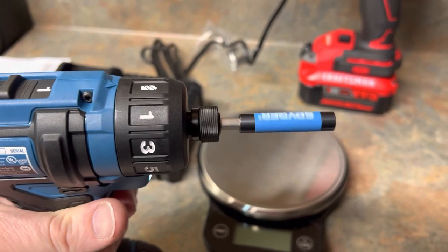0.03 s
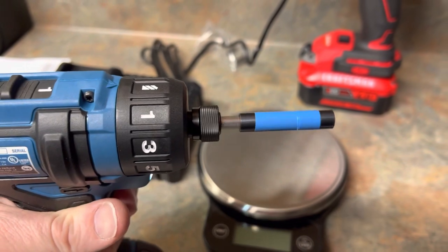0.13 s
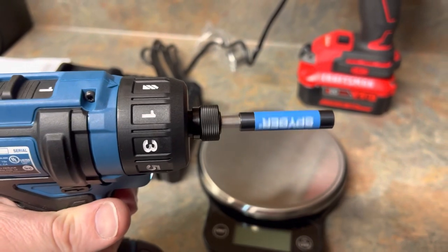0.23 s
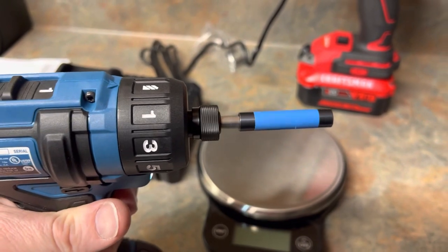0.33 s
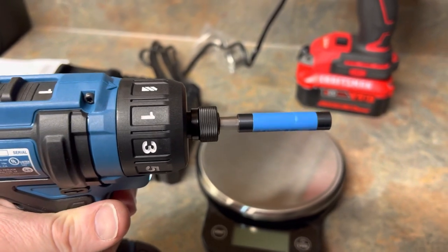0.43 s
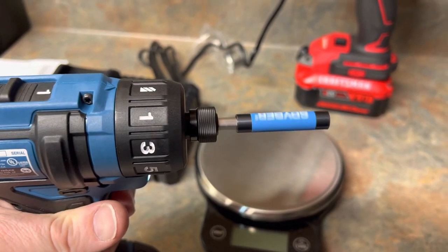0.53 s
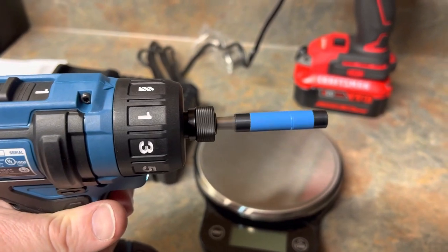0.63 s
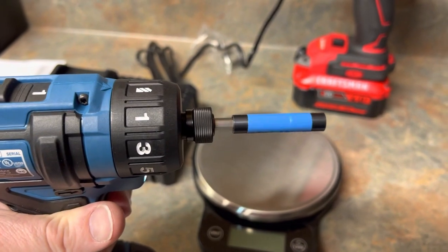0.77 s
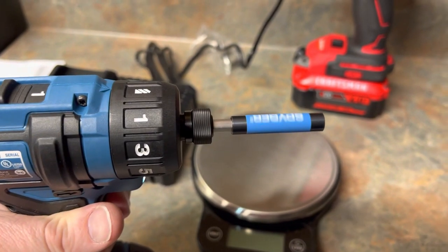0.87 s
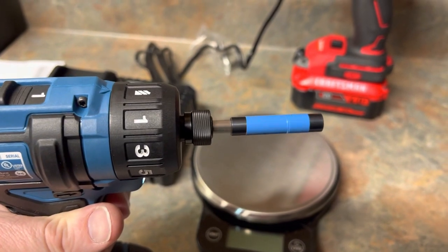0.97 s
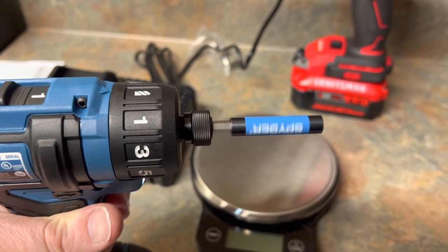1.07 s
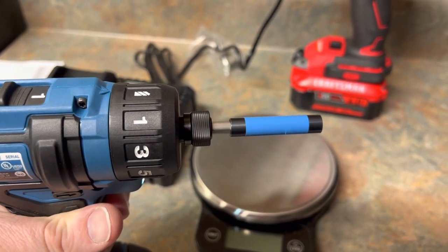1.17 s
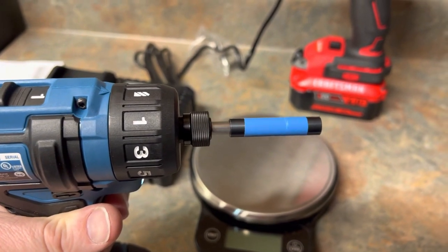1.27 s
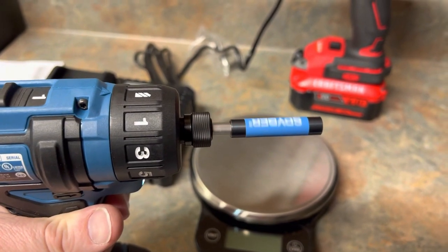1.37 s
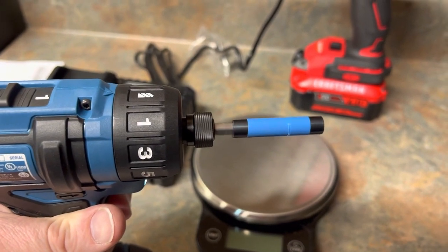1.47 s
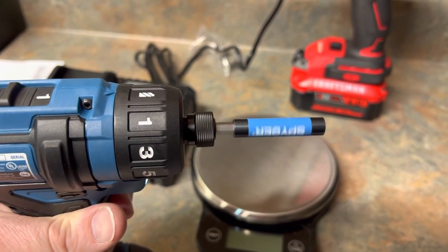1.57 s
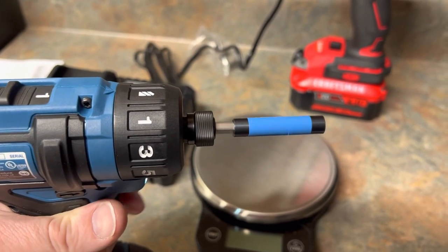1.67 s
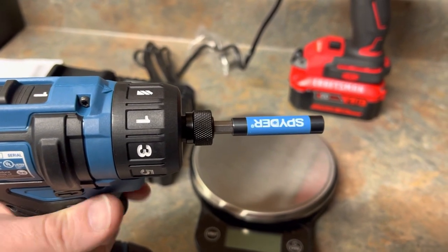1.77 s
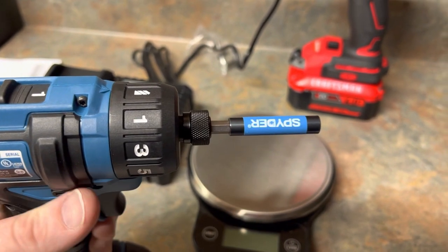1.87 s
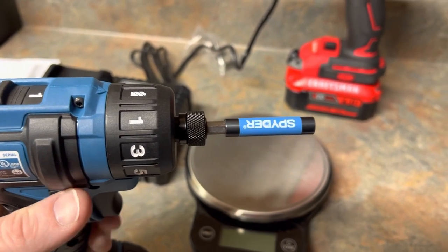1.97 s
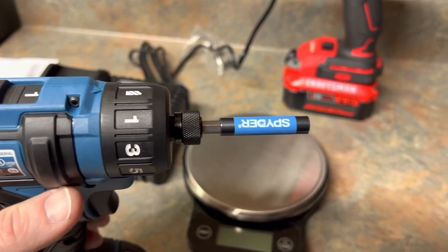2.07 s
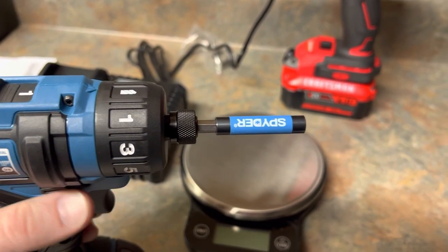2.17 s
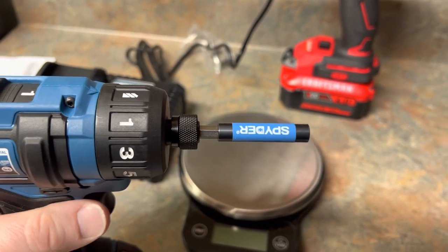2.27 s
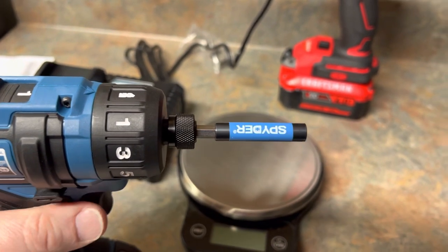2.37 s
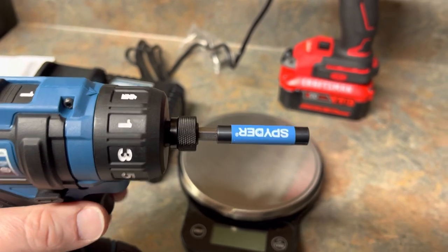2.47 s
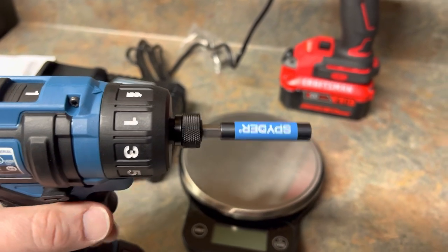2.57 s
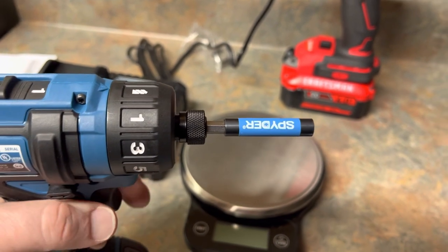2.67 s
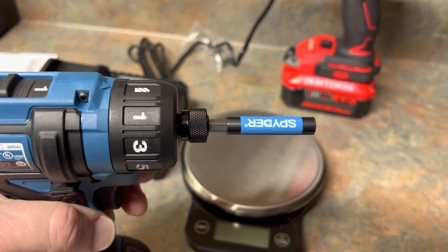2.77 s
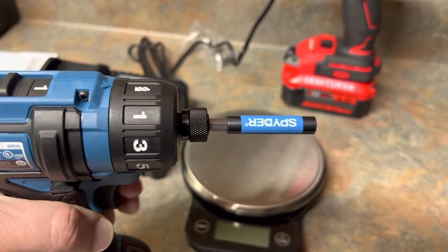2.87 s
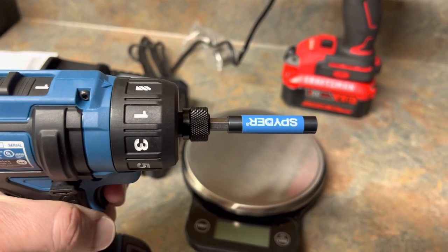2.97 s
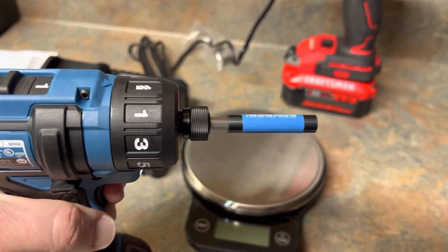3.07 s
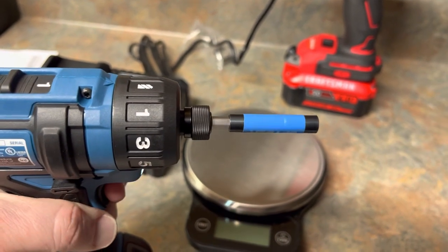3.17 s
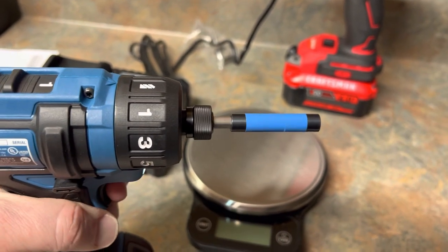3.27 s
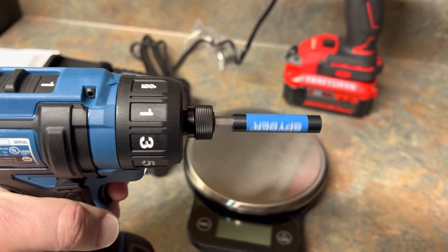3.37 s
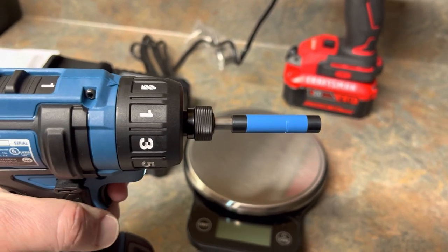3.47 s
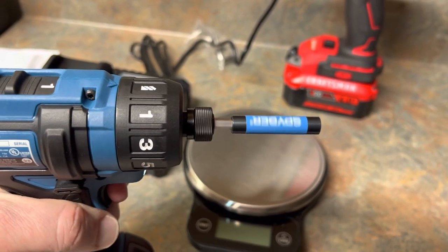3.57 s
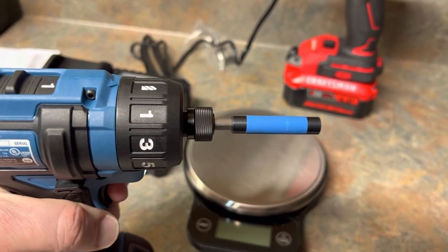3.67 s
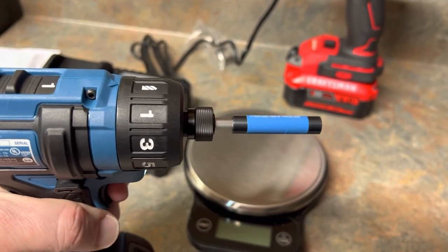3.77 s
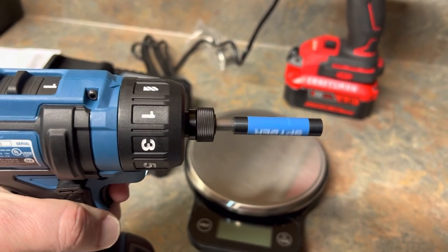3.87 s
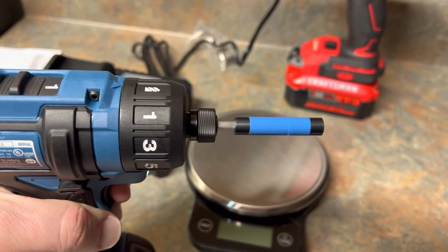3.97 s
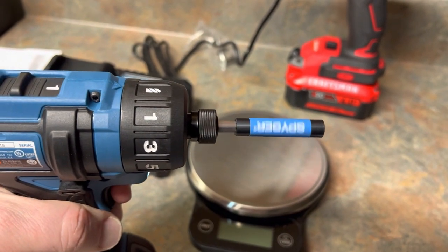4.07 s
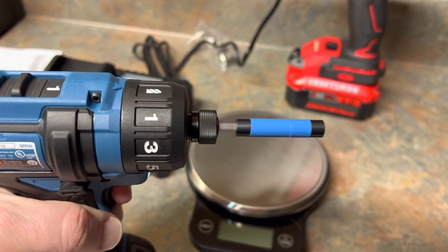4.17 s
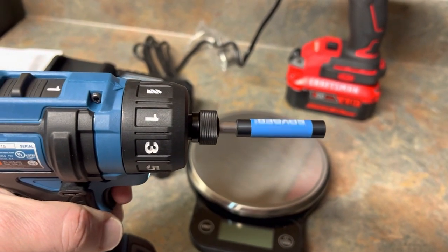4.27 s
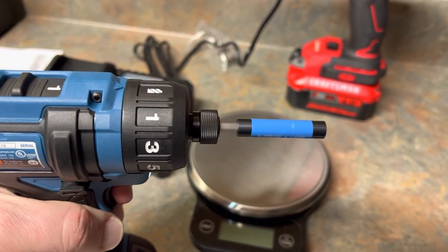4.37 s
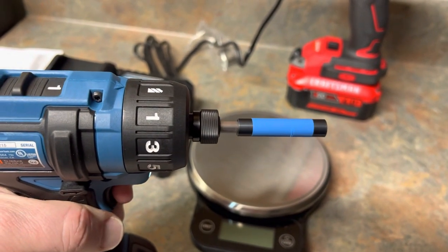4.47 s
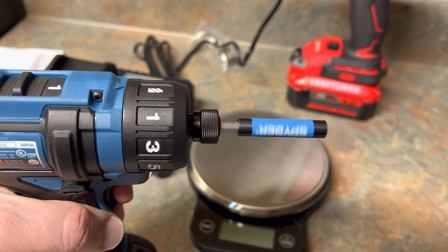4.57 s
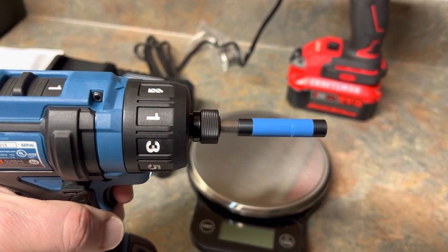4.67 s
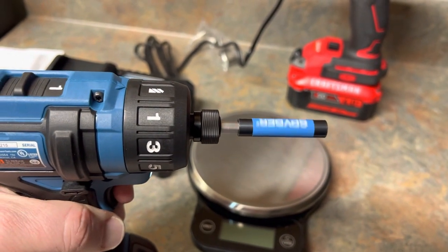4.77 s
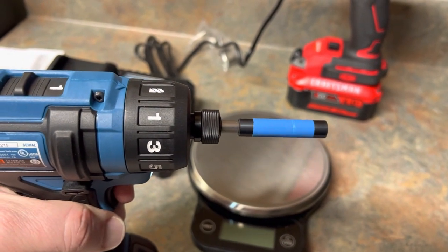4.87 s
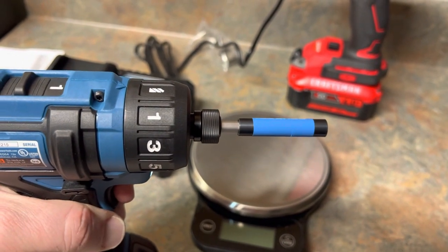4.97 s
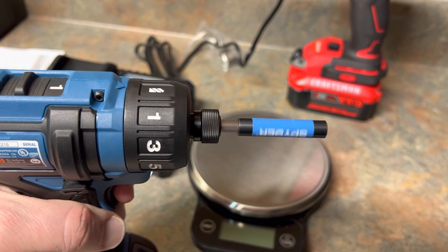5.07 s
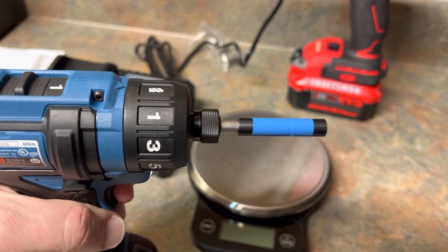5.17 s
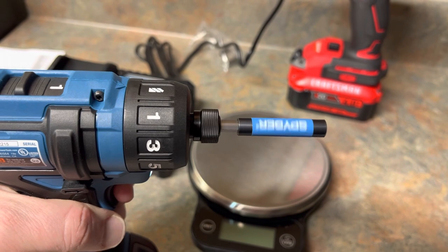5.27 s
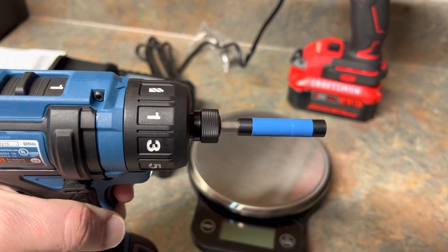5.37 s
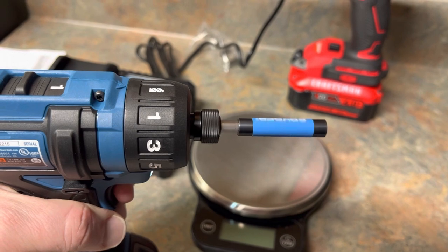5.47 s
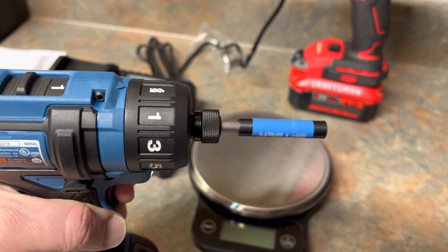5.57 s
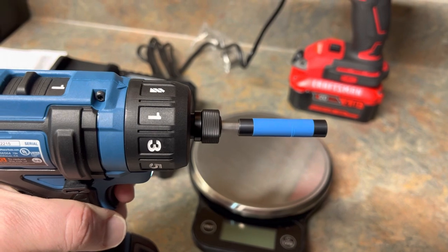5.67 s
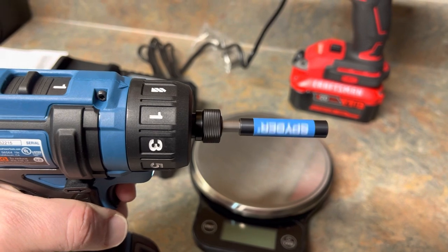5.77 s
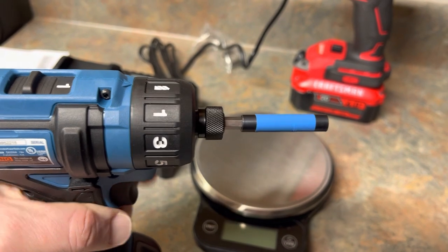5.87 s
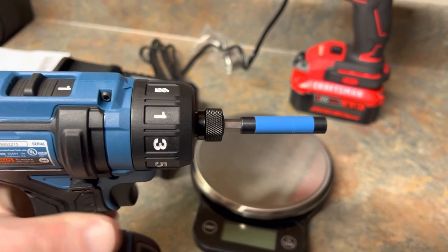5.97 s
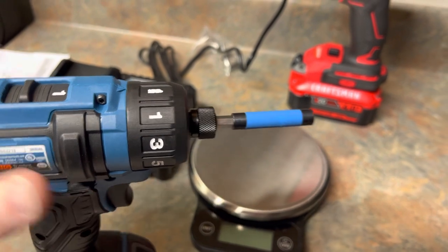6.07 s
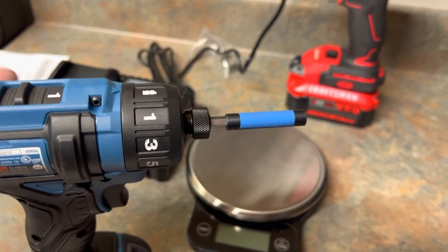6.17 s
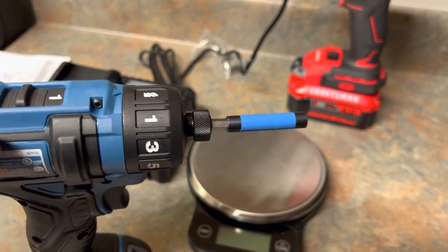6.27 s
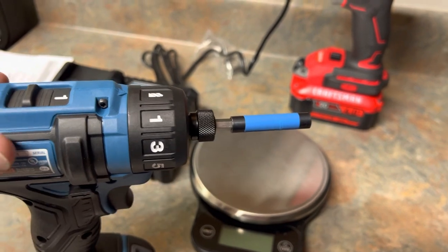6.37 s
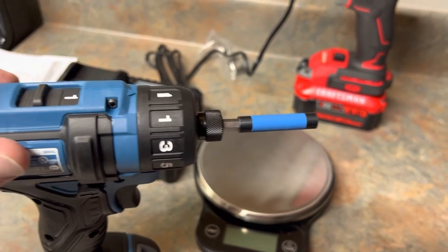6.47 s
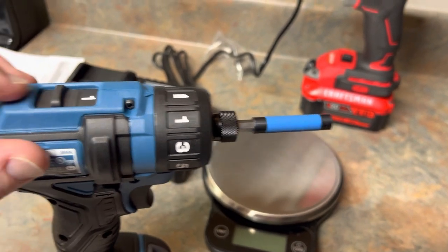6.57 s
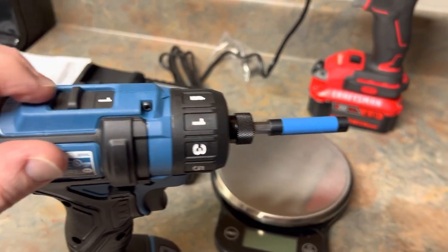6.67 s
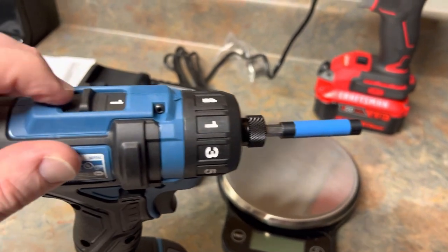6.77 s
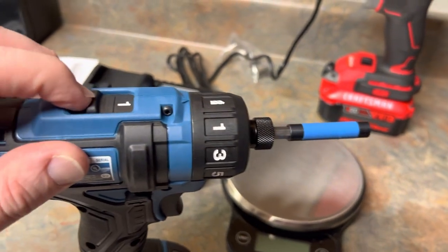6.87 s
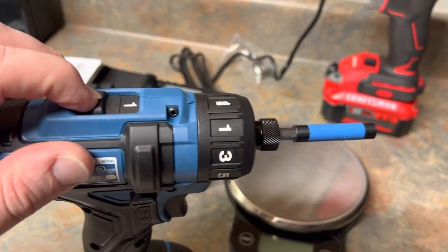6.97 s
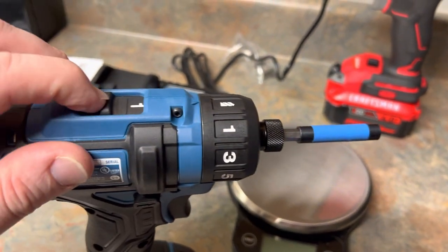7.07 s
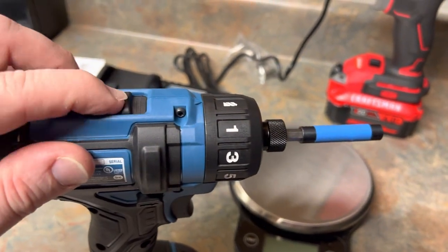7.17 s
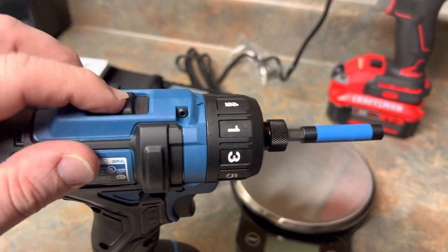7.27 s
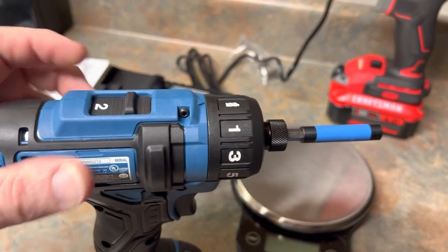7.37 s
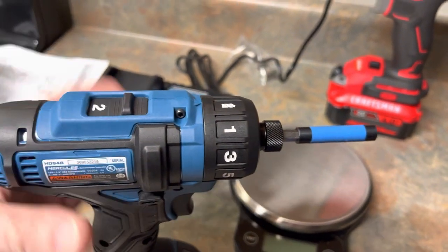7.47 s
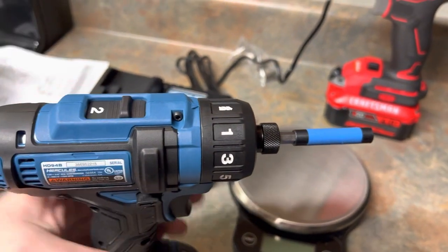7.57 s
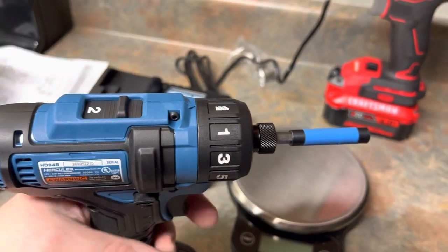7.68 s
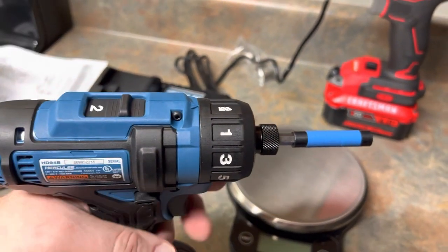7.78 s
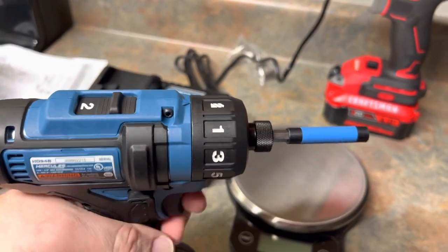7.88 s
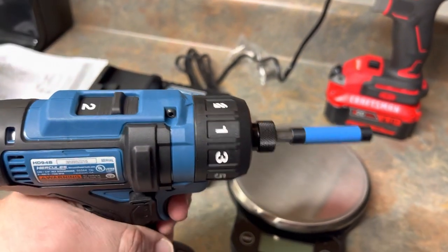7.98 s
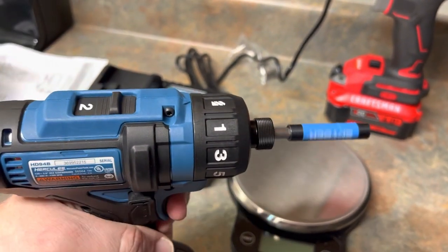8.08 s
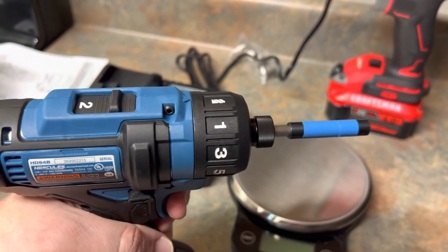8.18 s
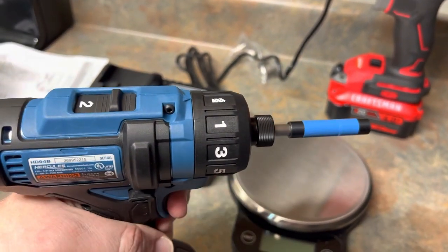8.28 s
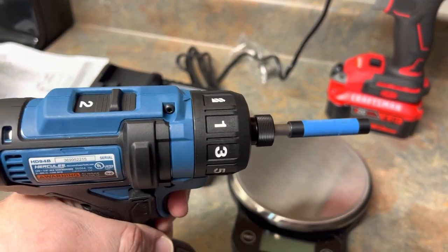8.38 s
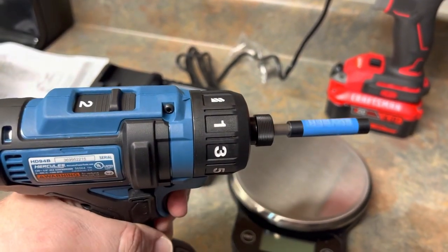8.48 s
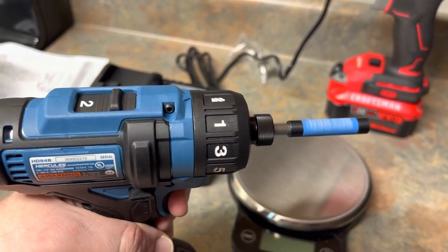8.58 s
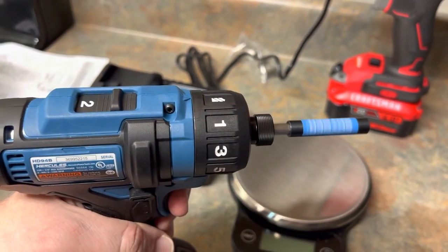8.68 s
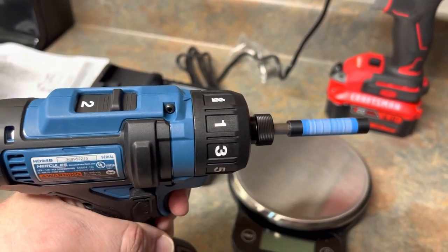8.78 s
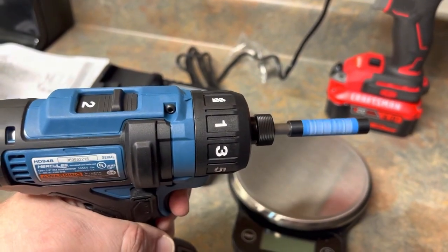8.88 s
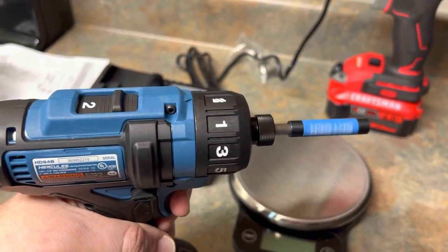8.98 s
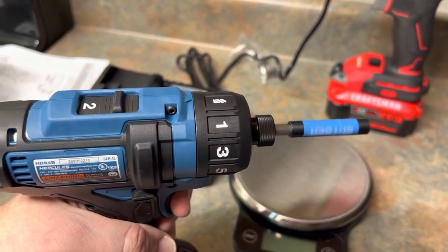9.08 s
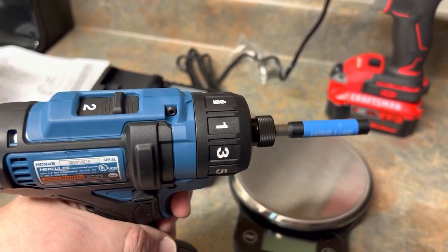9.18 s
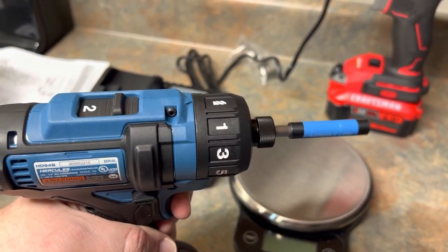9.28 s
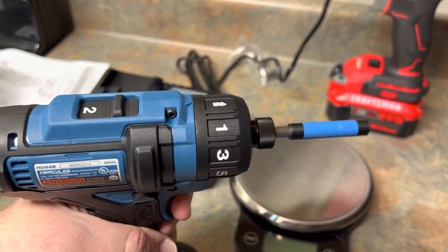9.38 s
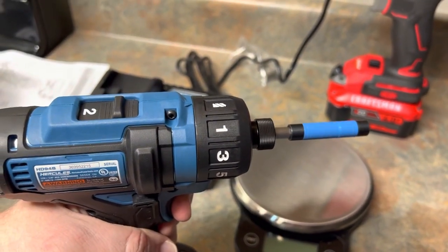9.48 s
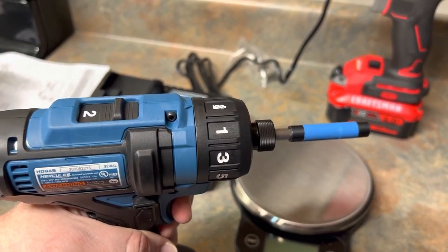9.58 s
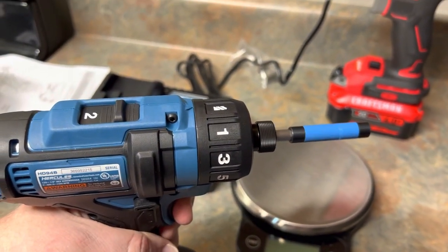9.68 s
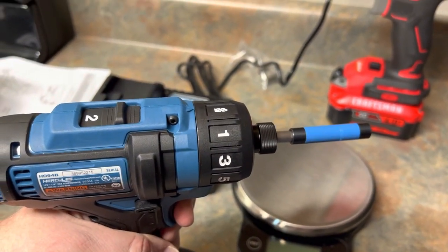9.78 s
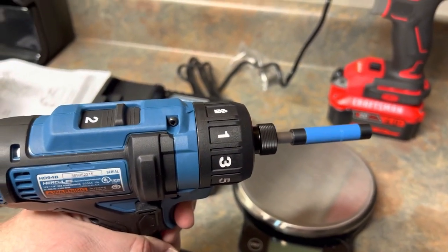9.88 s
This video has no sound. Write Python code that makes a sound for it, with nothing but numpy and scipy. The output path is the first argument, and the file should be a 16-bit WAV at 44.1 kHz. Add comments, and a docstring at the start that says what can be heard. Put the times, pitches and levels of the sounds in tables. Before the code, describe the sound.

Close up in a quiet kitchen, a cordless drill is already spinning unloaded, a steady whine over gear rattle. It brakes with a short clack. Soft handling bumps and clicks follow, then it runs again for about three seconds and stops. A hand flips a sharp switch, and a third, rougher run lasts until the cut.

```python
"""A cordless drill, already running close by, stops with a clack; two more free runs follow in a quiet kitchen.
The rotor sings in multiples of its speed, noise shaped by casing resonances is the gear rattle. Between runs a
hand shifts on the grip (noise swells) and flips switches (bursts ringing casing modes). Left and right differ
in phase and balance, with near reflections and the room's tail."""
import sys
import numpy as np
from scipy import signal
from scipy.fft import rfft, irfft, next_fast_len
from scipy.io import wavfile
from scipy.ndimage import uniform_filter1d

SR = 44100
rng = np.random.default_rng(int(sys.argv[2]) if len(sys.argv) > 2 else 0)


def invert_db(level):
    """Linear amplitude ratio for a level in decibels (20 dB per decade), elementwise."""
    return 10 ** (np.asarray(level, dtype=float) / 20)


def dump(signal):
    """Clip the signal to [-1, 1] and save it as 16-bit WAV at the path in sys.argv[1]."""
    limited = np.clip(np.atleast_2d(signal).T, -1, 1)
    pcm = np.round(limited * 32767).astype(np.int16)
    wavfile.write(sys.argv[1], SR, pcm)


N = 437472
T = np.arange(N) / SR

# Casing mode that lifts each multiple passing through it: centre in Hz, width in Hz, strength in dB.
LIFT = (709, 120, 7)
# Low bumps of the moving hands. Each row: loudest moment in s, rise in s, fall in s,
# relative rumble level in dB, relative deep level in dB.
BUMPS = [(1.775, 0.022, 0.071, -35.5, -52), (1.97, 0.08, .05, -59, -50), (2.12, 0.079, .08, -59, -51),
         (2.27, 0.071, 0.43, -41, -40), (2.38, 0.25, 0.089, -37.5, -45), (2.49, .03, 0.24, -30, -31),
         (2.99, .2, .05, -44, -57.5), (5.88, 0.024, 0.069, -31.5, -44), (6.09, 0.076, 0.46, -32.5, -45.5),
         (6.3, .4, 0.16, -48, -38), (6.5, 0.048, 0.092, -40, -53), (6.6, 0.18, 0.045, -62, -44),
         (6.85, 0.18, 0.55, -52, -51.5), (7.02, 0.33, .08, -59, -47), (7.13, 0.055, 0.12, -37, -27.5),
         (7.38, 0.24, .08, -59, -46.5), (7.85, 0.056, 0.29, -31.5, -36.5), (7.91, .2, .06, -43, -31),
         (8.0, 0.057, .06, -29, -35)]


def rms_one(x):
    """Scale to unit power."""
    return x / np.sqrt(np.mean(x ** 2) + 1e-20)


def at_hz(rows, hz, index=1):
    """Read a column of a table along log frequency."""
    rows = np.array(rows, float)
    return np.interp(np.log(np.maximum(hz, 1)), np.log(rows[:, 0]), rows[:, index])


def drift(rate_hz, size, shape=lambda slow: slow):
    """Slow chance of spread 1 from two equal low-pass poles at 60 knots per s, passed through a shape."""
    knots = rng.standard_normal(int(size / SR * 60) + 60)
    pole = np.exp(-2 * np.pi * rate_hz / 60)
    slow = signal.lfilter([1], [1, -2 * pole, pole * pole], knots)[50:]
    return np.interp(np.arange(size) * 60 / SR, np.arange(len(slow)), shape(rms_one(slow)))


def coloured(x, db_at):
    """Give white sound a spectrum."""
    return irfft(rfft(x) * invert_db(db_at(np.fft.rfftfreq(len(x), 1 / SR))), len(x))


def band(x, low_hz, high_hz):
    """Band-pass."""
    return signal.sosfilt(signal.butter(2, [low_hz, high_hz], "band", fs=SR, output="sos"), x)


def ring(contact, hz, t60_s):
    """Damped resonator: a unit click sets a sine of height 1 ringing."""
    pole, w = invert_db(-60 / (t60_s * SR)), 2 * np.pi * hz / SR
    return signal.lfilter([0, np.sin(w)], [1, -2 * pole * np.cos(w), pole * pole], contact + 1e-18)


def swells(rows, index, bend):
    """Gain over time: each event rises to its level and falls away, 33 dB down after its rise or fall time."""
    t = T[::32]
    power = 0
    for row in rows:
        distance = np.abs(t - row[0]) / np.where(t < row[0], row[1], row[2])
        power = power + invert_db(2 * (row[index] - 33 * distance ** bend))
    return np.interp(T, t, np.sqrt(power))


def floor():
    """Room murmur as coloured noise, plus a low hum wavering in pitch and level."""
    # Each row: frequency in Hz, relative density in dB per Hz.
    murmur_rows = [(18, -33), (30, 4.5), (49, -2), (64, -18), (92, -4.5), (215, -30), (358, -29),
                   (414, -36.5), (1660, -42), (10000, -66), (13000, -105), (22000, -120)]
    murmur = rms_one(coloured(rng.standard_normal(N), lambda hz: at_hz(murmur_rows, hz)))
    hum = np.sin(2 * np.pi * np.cumsum(43 + .8 * drift(2.5, N)) / SR)
    return invert_db(-44) * murmur + invert_db(-47.5 + .9 * drift(3.0, N)) * hum


def hands(rub_db, rumble_db, deep_db):
    """Skin and cloth slide as grainy noise, and a switch slides just before it snaps near 7.1 s; movements add
    a lumpy rumble and deeper bumps."""
    # Each row: loudest moment in s, rise in s, fall in s, relative level in dB.
    rubs = [(2.01, 0.12, .1, -67), (2.18, 0.11, 0.1, -74.5), (2.57, 0.068, 0.1, -63),
            (2.925, 0.061, 0.03, -50.5), (6.086, 0.12, .04, -56), (6.37, .04, 0.095, -76.5),
            (6.84, .05, 0.036, -70), (7.113, 0.012, 0.0039, -26), (7.33, 0.022, 0.1, -60.5),
            (7.41, .06, .06, -71.5), (7.935, 0.099, 0.086, -57)]
    # Each row: frequency in Hz, relative density in dB per Hz.
    rub_rows = [(180, -35), (300, -3), (597, -14.5), (2000, -2), (4540, -19), (8600, -15), (13800, -36.5),
                (15000, -36)]
    fidget = invert_db(-67.5)  # the hands never quite rest
    grain_gain = invert_db(3.6 * rng.standard_normal(N // 100 + 1).repeat(100)[:N])
    rub = coloured(rng.standard_normal(N) * grain_gain, lambda hz: at_hz(rub_rows, hz))
    rub = rub / np.std(band(rub, 3700, 5600)) * swells(rubs, index=3, bend=1.1)
    rumble = rms_one(band(band(rng.standard_normal(N), 70, 200), 70, 200))
    rumble = rumble * (swells(BUMPS, index=3, bend=0.9) + fidget)
    deep = rms_one(band(band(rng.standard_normal(N), 55, 100), 55, 100))
    deep = deep * (swells(BUMPS, index=4, bend=1.01) + fidget)
    return rub * invert_db(rub_db) + rumble * invert_db(rumble_db) + deep * invert_db(deep_db)


def clicks(crack_db):
    """Switches and knocks: a contact burst rings the casing modes near its pitch, with a crack above."""
    # Each row: start in s, body peak in dB, favoured pitch in Hz, relative crack peak in dB,
    # focus in dB per octave, burst decay in s.
    knocks = [(2.259, -36, 1300, -62, 26, 0.00354), (2.354, -22, 770, -31.5, 7, 0.0056),
              (2.485, -27.5, 380, -72, 39, 0.0044), (2.571, -43.5, 1300, -61, 8, 0.012),
              (2.657, -46.5, 860, -86, 39, 0.0042), (2.962, -40.5, 692, -69, 12.5, 0.0029),
              (6.077, -28.5, 420, -70.5, 12, 0.0034), (6.124, -35, 557, -77, 25, 0.0032),
              (6.242, -56, 3300, -84, 20, 0.0021), (6.352, -47, 3300, -70, 18, .003),
              (6.487, -22.5, 1720, -29, 6, 0.00096), (6.978, -43, 1060, -71, 21, 0.002),
              (7.023, -54.5, 1200, -77, 3, .002), (7.115, -11, 1450, -22, 13, .0035),
              (7.29, -18, 1150, -48, 36, .0007), (7.847, -37.5, 536, -81, 28, 0.0046),
              (7.885, -42.5, 560, -72, 21.5, 0.0033), (7.988, -31.5, 1170, -59, 14, 0.0028)]
    # Each row: mode in Hz, t60 in s.
    modes = [(330, 0.023), (590, 0.035), (880, 0.03), (1070, 0.035), (1180, .05), (1420, 0.065),
             (1700, 0.023), (2040, 0.05), (2470, 0.027), (2890, 0.019), (3450, 0.019)]
    out, size = np.zeros(N), 4000
    for start_s, body_db, pitch_hz, treble_db, focus, burst_s in knocks:
        rise = np.minimum(T[:size] / (0.34 * burst_s), 1)
        contact = rng.standard_normal(size) * np.exp(-T[:size] / burst_s) * rise
        body = 0
        for hz, t60_s in modes:
            body = body + ring(contact, hz, t60_s) * invert_db(-focus * abs(np.log2(hz / pitch_hz)))
        low_hz, high_hz = pitch_hz / 3.5, pitch_hz * 3.0
        clatter = band(band(contact, low_hz, high_hz), low_hz, high_hz)
        # loose knocks (low focus) are more clatter than ring
        body = body / np.abs(body).max() + invert_db(8 - .75 * focus) * clatter / np.abs(clatter).max()
        crack = band(contact, 2200, 10500)
        knock = invert_db(body_db) * body / np.abs(body).max()
        knock = knock + invert_db(treble_db + crack_db) * crack / np.abs(crack).max()
        at = round(start_s * SR)
        out[at:at + size] += knock
    return out


def switching():
    """Speed control as the trigger closes: chopped current sings a brief tone with its octave."""
    # Each row: start in s, length in s, tone in Hz, level in dB.
    tones = [(2.999, 0.055, 5240, -42.5), (8.014, 0.055, 5100, -38)]
    out = 0
    for start_s, length_s, hz, db in tones:
        gate = np.clip(np.minimum(T - start_s, start_s + length_s - T) / .003, 0, 1)
        tone = np.sin(2 * np.pi * hz * T) + 0.59 * np.sin(4 * np.pi * hz * T)
        out = out + invert_db(db) * gate * tone
    return out


def rotor(run):
    """Speed in turns per s and levels in dB of one pull: spin-up, settling, coasting, brake."""
    # Each row: rotor start in s, trigger release in s, brake bite in s, top speed in turns per s.
    # The last pull is held to the end.
    pulls = [(-.246, 1.622, 1.711, 360.1), (2.984, 5.8, 5.837, 349.7), (7.997, 20, 20, 340.9)]
    # Lag below top speed. Each row: quick lag in turns per s, its decay in s, slow lag, its decay in s.
    settling = [(35, .047, 4, .45), (35, .047, 3.9, .33), (31, .035, 15.4, .55)]
    # Relative levels at full speed. Each row: dB after the spin-up, dB settled, settling time in s.
    unbalance_rows = [(-25, -40, 0.71), (-19.5, -22, 0.83), (-21.5, -25, .6)]
    rattle_rows = [(-28, -28, .6), (-29, -29.5, 0.86), (-27.5, -27.5, .6)]
    whine_rows = [(-22, -22.5, 0.51), (-22, -29.5, 0.54), (-18, -24, .6)]
    # Relative unbalance with the current off, one level in dB per run.
    coasting_db = [-25, -22.5, -25]
    # Gears take up their play. Each row: surge in dB, time after the start in s, width in s.
    surges = [(6, .085, .015), (7, 0.0823, 0.0085), (2, .088, .02)]
    # Tool rocking in the hand: note in Hz, half width in Hz; then one strength per run.
    rocking = (205, 9.1)
    rocking_strength = [3, 3.1, 0.61]
    audible_after_s, stopped_after_s, spin_up_s = .017, .065, .13

    start, release, brake, top = pulls[run]
    first_sample = max(0, round((start + audible_after_s) * SR))
    span = slice(first_sample, min(N, round((brake + stopped_after_s) * SR)))
    t = T[span]
    since, up = t - start, np.maximum(t - start - spin_up_s, 0)
    coasting, braking = np.clip(t - release, 0, brake - release), np.maximum(t - brake, 0)

    quick, quick_s, slow, slow_s = settling[run]
    limit = top - quick * np.exp(-up / quick_s) - slow * np.exp(-up / slow_s)
    speed = np.minimum(430 * (1 - np.exp(-since / .112)), limit)
    speed = (speed - 310 * coasting) * np.exp(-braking / 0.047)
    slack_db = 20 * np.log10(speed / top)

    onset_db = -29.5 * np.exp(-(since - audible_after_s) / 0.011)
    levels = []
    for rows in (unbalance_rows, rattle_rows, whine_rows):
        first, settled, settle_s = rows[run]
        levels.append(settled + (first - settled) * np.exp(-up / settle_s) + onset_db)
    unbalance, rattle, whine = levels

    off = coasting / (brake - release + 1e-9)
    unbalance = (1 - off) * unbalance + off * coasting_db[run] + 3.6 * slack_db
    unbalance = unbalance + 10 * np.minimum(braking / .02, 1)  # braking current keeps shaking
    # rocking: unbalance swells below the note and dips just above
    note_hz, half_width_hz = rocking
    strength = rocking_strength[run]
    rock = np.abs(1 - strength / ((speed - note_hz) / half_width_hz - 1j))
    rock_at_top = np.abs(1 - strength * half_width_hz / (top - note_hz))
    unbalance = unbalance + 20 * np.log10(rock / rock_at_top)

    surge_db, surge_s, surge_width_s = surges[run]
    rattle = rattle + surge_db * np.exp(-((since - surge_s) / surge_width_s) ** 2) - 295 * braking
    # clack: the brake throws the gears back
    rattle = rattle + 9.5 * np.minimum(braking / 0.0031, 1) * np.exp(-(braking / .025) ** 2)
    whine = whine + 1.6 * slack_db - 297 * braking
    return span, speed, braking, unbalance, rattle, whine


def growl(run, speed, turn, rattle, waver_db):
    """Low rotor multiples and gear meshes, lifted where they pass through a casing mode."""
    # Each row: multiple of rotor speed in quarters, then relative level in dB in runs 1, 2, 3.
    lines = [(7, -34, -20.5, -18), (8, -12, -12.5, -15), (12, -4.5, -4.5, -15), (16, -15, -16.5, -27.5),
             (20, -8.5, -15.5, -12.5), (24, -11, -6, -9), (36, -21, -28.5, -13.5), (44, -16, -18, -38)]
    size, full = len(speed), speed / speed.max()
    mode_hz, width_hz, lift_db = LIFT
    out = 0
    for row in lines:
        multiple = round(row[0]) / 4
        detune = 2 * (multiple * speed - mode_hz) / width_hz
        lift = 1 + invert_db(lift_db) / (1 + detune ** 2) / full ** 0.61
        gain = invert_db(rattle + 1 + row[1 + run] + waver_db * drift(4.6, size))
        out = out + full ** 2.0 * lift * gain * np.sin(multiple * turn + rng.uniform(0, 2 * np.pi))
    return out


def mesh(run, speed, turn, rattle, waver_db):
    """First gear mesh at 8.06 times rotor speed, given extra level by strain just below full speed."""
    # Each row, one per run: relative level in dB, extra dB per unit of strain.
    mesh_db = [(-15, 1.94), (-16.5, 3), (-19.5, 19.4)]
    size, full = len(speed), speed / speed.max()
    strain = np.clip(20 * (1 - full), 0, 1) * full ** 4.0
    base_db, extra_db = mesh_db[run]
    gain = invert_db(rattle + 3.5 + base_db + extra_db * strain + waver_db * drift(15.0, size))
    return gain * full ** 3.3 * np.sin(8.06 * turn)


def ripple(run, speed, turn, rattle, braking):
    """Torque ripple, heard while the rotor speeds up or brakes, lifted by two casing modes."""
    # Each row: multiple of rotor speed, then relative level in dB in runs 1, 2, 3.
    lines = [(3, -6, -1.5, -1), (6, -16, -15, -18), (9, -16, -12.5, -10)]
    # Higher casing mode: centre in Hz, width in Hz, strength in dB.
    high_lift = (2000, 350, 20)
    change = np.abs(uniform_filter1d(np.gradient(speed) * SR, size=300))  # turns per s, per s
    # braking current keeps shaking while the gears fall quiet
    push = np.clip(change / 2500, 0, 1) ** 3.0 * invert_db(250 * braking)
    out = 0
    for row in lines:
        multiple = round(row[0])
        lift = 0.44
        for hz, width_hz, db in (LIFT, high_lift):
            lift = lift + invert_db(db) / (1 + (2 * (multiple * speed - hz) / width_hz) ** 2)
        gain = invert_db(rattle - 1 + row[1 + run] + 4.5 * drift(28.0, len(speed)))
        out = out + push * lift * gain * np.sin(multiple * turn)
    return out


def handle(run, rattle):
    """The handle sings its own wavering note, as loud as the rattle drives it."""
    # Row: note in Hz, then relative level in dB in runs 1, 2, 3.
    handle_row = (182.5, -6.5, -12, -17)
    size = len(rattle)
    phase = 2 * np.pi * np.cumsum(handle_row[0] + 1.7 * drift(6.6, size)) / SR
    return invert_db(rattle + 1.5 + handle_row[1 + run] + 1.5 * drift(12.0, size)) * np.sin(phase)


def blades(run, speed, turn, whine, waver_db):
    """Slots and fan blades whine at high multiples of rotor speed, thinner below full speed."""
    # Each row: multiple of rotor speed, then relative level in dB in runs 1, 2, 3.
    lines = [(13, -51, -59, -60), (14, -54, -54, -51), (15, -48, -46, -48), (16, -52, -57, -57),
             (17, -58, -55, -52), (18, -38, -46, -45), (19, -48, -49, -44), (20, -47, -55, -47),
             (21, -47, -45, -42), (22, -46, -40, -41), (23, -45, -43, -55), (24, -42, -42, -51),
             (25, -41, -39, -45), (26, -45, -48, -41), (27, -37, -39, -51), (28, -57, -43, -43),
             (29, -51, -50, -46), (30, -24, -37, -46), (31, -34, -38, -36), (32, -44, -39, -36),
             (33, -29, -38, -30), (34, -39, -38, -37), (35, -51, -42, -33), (36, -40, -35, -35),
             (37, -42, -47, -39), (38, -48, -47, -40), (39, -41, -57, -44), (40, -43, -51, -46),
             (41, -56, -50, -46), (42, -52, -46, -46), (43, -50, -47, -44), (44, -60, -53, -39),
             (45, -60, -46, -50), (46, -60, -60, -44)]
    size, full = len(speed), speed / speed.max()
    out = 0
    for row in lines:
        gain = drift(5.0, size, lambda slow: invert_db(row[1 + run] + waver_db * slow))
        out = out + gain * np.sin(round(row[0]) * turn + rng.uniform(0, 2 * np.pi))
    return rms_one(out) * invert_db(whine) * full ** 2.4


def gears(run, turn, rattle, throb, grit_db):
    """Gear rattle and fan air: uneven noise, throbbing once a turn, through casing resonances."""
    # Each row: frequency in Hz, then relative density in dB per Hz in runs 1, 2, 3.
    spectrum = [(60, -64, -69, -63.5), (106, -73, -72.5, -69.5), (249, -70, -72, -60),
                (450, -72, -69.5, -63), (905, -64.5, -65, -60), (1420, -62, -64.5, -60),
                (2410, -64.5, -67.5, -57.5), (3300, -68.5, -71.5, -67.5), (4530, -69.5, -74.5, -68),
                (7100, -69.5, -72.5, -64.5), (8400, -66.5, -68, -57.5), (9100, -73.5, -74, -63),
                (10600, -65, -66, -66), (12900, -71.5, -74, -60.5), (15500, -94, -99, -94.5)]
    # Each row: resonance in Hz, width in Hz, then dB over the rattle in runs 1, 2, 3.
    resonances = [(89, 11, 9, 11, 18.8), (187, 9.1, 10.5, 8.7, 2), (547, 50, 8, 4, 3.1),
                  (1770, 46, 2, 3.5, 8.8), (2050, 99, 10.5, 13.1, 7), (4100, 190, 3, 10, 0.45),
                  (4700, 84, 4, 11, 1.5), (6040, 350, -2, 3, 1.3)]
    size = len(turn)
    teeth = rng.standard_normal(size) * (1 + throb * np.sin(turn)) * invert_db(grit_db * drift(21.0, size))

    def casing(hz):
        """Rattle spectrum with its resonances, in dB."""
        peaks = 0
        for row in resonances:
            peaks = peaks + invert_db(2 * row[2 + run]) / (1 + (2 * (hz - row[0]) / row[1]) ** 2)
        return at_hz(spectrum, hz, index=1 + run) + 10 * np.log10(1 + peaks)

    noise = coloured(np.pad(teeth, (0, next_fast_len(size) - size)), casing)[:size]
    return noise / np.std(band(noise, 1200, 4000)) * invert_db(rattle)


def motor(run, throb, grit_db, rattle_db, whine_db):
    """One pull of the trigger: unbalance, whine and rattle all follow the rotor."""
    # Each row, one per run: speed jitter in turns per s, wavering of the lines in dB.
    unsteady = [(.04, 1.3), (.04, 1.3), (.1, 2.2)]
    span, speed, braking, unbalance, rattle, whine = rotor(run)
    size = len(speed)
    jitter, waver_db = unsteady[run]
    turn = 2 * np.pi * np.cumsum(speed + jitter * drift(7.4, size)) / SR
    low = invert_db(unbalance + 4.0) * np.sin(turn)
    low = low + growl(run, speed, turn, rattle, waver_db)
    low = low + mesh(run, speed, turn, rattle, waver_db)
    low = low + ripple(run, speed, turn, rattle, braking)
    low = low + handle(run, rattle)
    high = blades(run, speed, turn, whine + whine_db, waver_db)
    noise = gears(run, turn, rattle + rattle_db, throb, grit_db)
    # short fades; the last run is cut off before its fade-out
    fade = signal.windows.tukey(size + 200 * (run == 2), 400 / size)[:size]
    out = np.zeros(N)
    out[span] = (low + high + noise) * fade
    return out


def stereo_and_room(near, background):
    """Stereo spread: direct phase and balance, near reflections opposite on each side, the kitchen's tail."""
    # Each row: frequency in Hz, left lead in radians, left minus right in dB, near reflections in dB.
    spread = [(60, 0, .3, -28), (300, 0, .6, -20), (700, 0, -1.5, -16), (1500, .3, 0, -8),
              (3000, -.3, -.5, -8), (5200, -1, -4.5, -2), (8300, -.7, -1, -6), (9200, .3, 0, -9),
              (10150, 2.9, 0, -14), (10850, 3.4, 0, -14), (11500, 5.9, 0, -12), (12900, 6.6, 0, -12),
              (13500, 9.2, 0, -14), (14400, 9.7, 0, -14), (14900, 12, 0, -12), (16000, 12.6, 0, -14)]
    # Each row: frequency in Hz, t60 in s.
    room = [(200, 0.93), (700, 0.55), (2000, 0.33), (5000, 0.29), (10000, 0.29)]
    size = next_fast_len(N + SR)
    hz, t, side = np.fft.rfftfreq(size, 1 / SR), T[:SR // 2], np.array([[.5], [-.5]])
    direct = invert_db(side * at_hz(spread, hz, index=2)) * np.exp(1j * side * at_hz(spread, hz, index=1))
    early = rng.standard_normal(len(t)) * np.exp(-t / 0.0035) * 2 * side
    early = early / np.linalg.norm(early, axis=1, keepdims=True)
    early = rfft(early, size) * invert_db(at_hz(spread, hz, index=3))
    tail = 0
    for f, t60_s in room:
        tail = tail + band(rng.standard_normal((2, len(t))), f / 3.12, f * 1.065) * invert_db(-60 * t / t60_s)
    tail = rfft(tail / np.linalg.norm(tail, axis=1, keepdims=True), size) * invert_db(-14)
    unlike = np.clip(hz / 900, 0, 1) ** 1.5  # long waves reach both sides alike
    tail = tail.mean(axis=0) + unlike * side * (tail[0] - tail[1])
    heard = rfft(near, size) * (direct + early + tail) + rfft(background, size) * (direct + early)
    return irfft(heard, size)[:, :N]


def scene():
    """Three drill runs, switching tones, knocks and hands over the floor, heard in stereo."""
    near = hands(rub_db=-7.0, rumble_db=-2.4, deep_db=-4.0)
    near = near + clicks(crack_db=12.5) + switching()
    near = near + motor(0, throb=0.49, grit_db=0.43, rattle_db=-1.5, whine_db=1.0)
    near = near + motor(1, throb=0.33, grit_db=1.48, rattle_db=-0.6, whine_db=1.4)
    near = near + motor(2, throb=0.26, grit_db=1.33, rattle_db=0.06, whine_db=-1.0)
    return stereo_and_room(near, floor())


def roll_off(x):
    """The treble ends steeply here."""
    return signal.sosfilt(signal.butter(12, 17100, fs=SR, output="sos"), x)


def record(dry):
    """The microphone drops the deepest bass, below 39 Hz."""
    bass_cut = signal.butter(8, 39, "high", fs=SR, output="sos")
    return roll_off(signal.sosfilt(bass_cut, dry))


dry = scene()
out = record(dry)
dump(out)
```